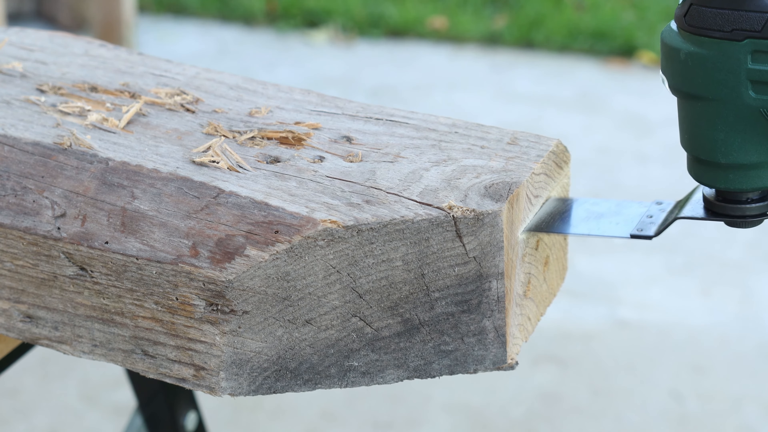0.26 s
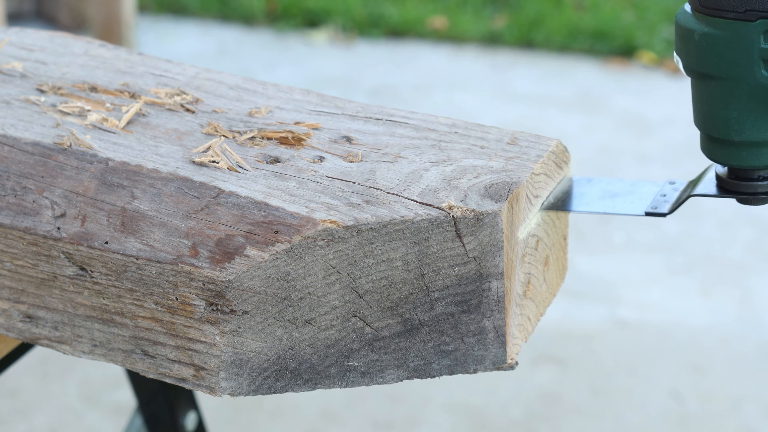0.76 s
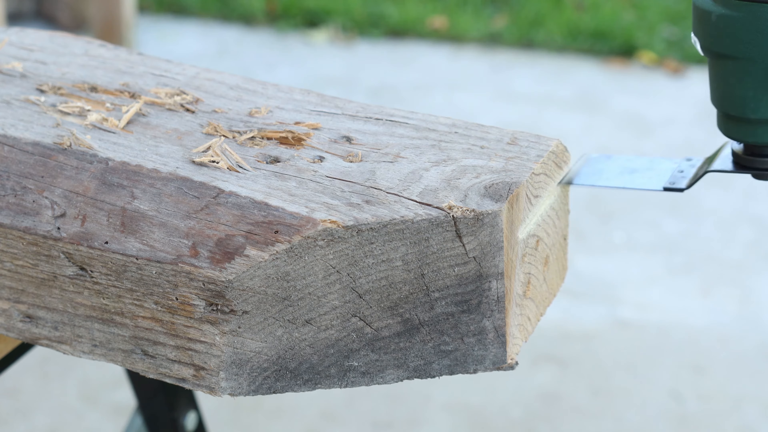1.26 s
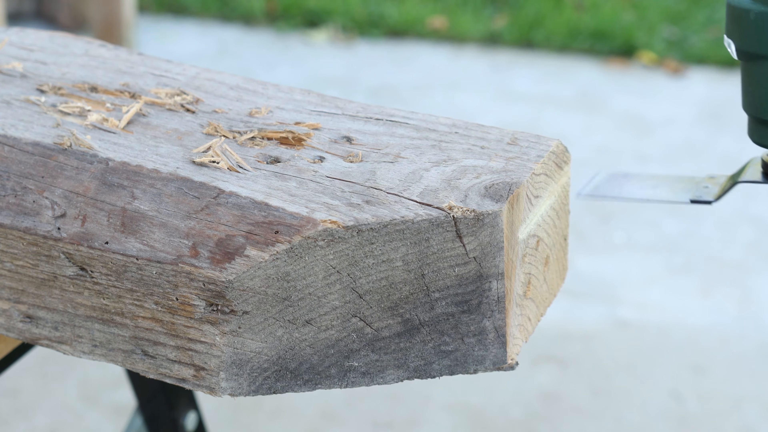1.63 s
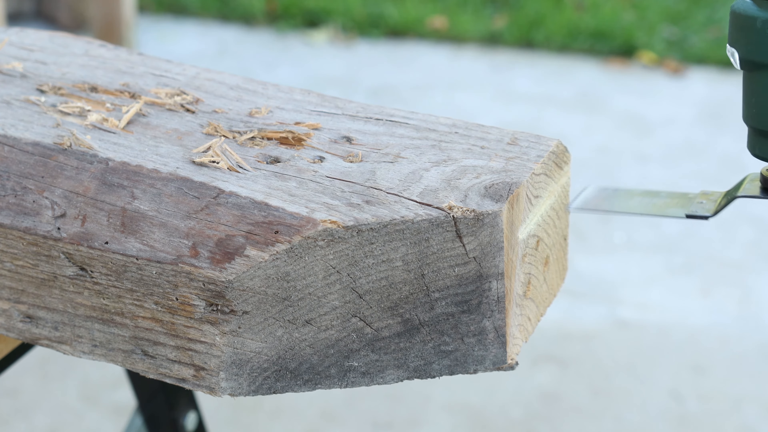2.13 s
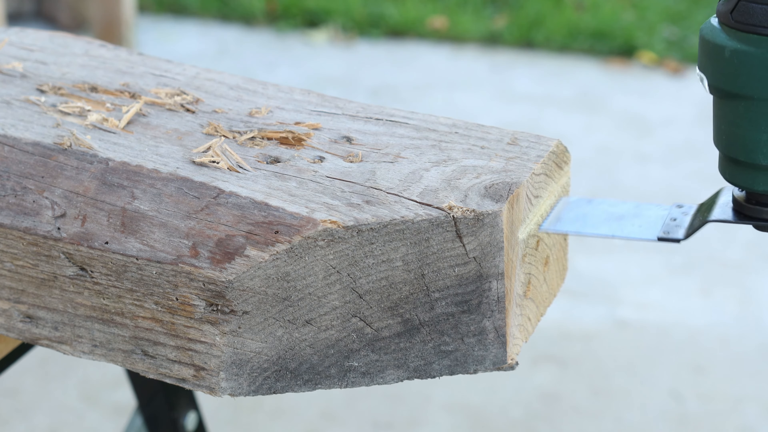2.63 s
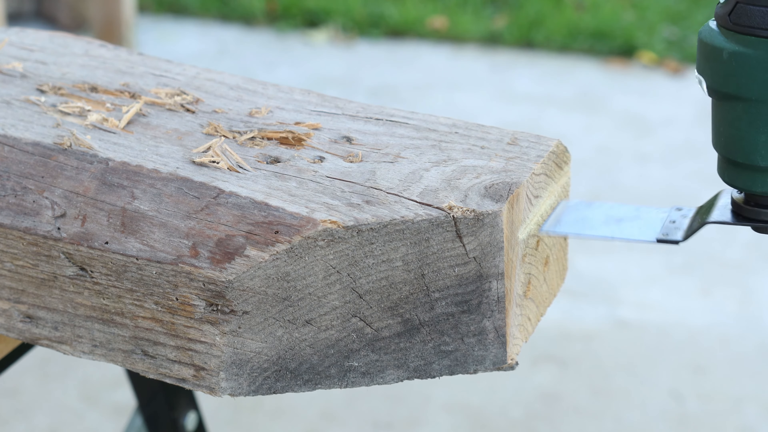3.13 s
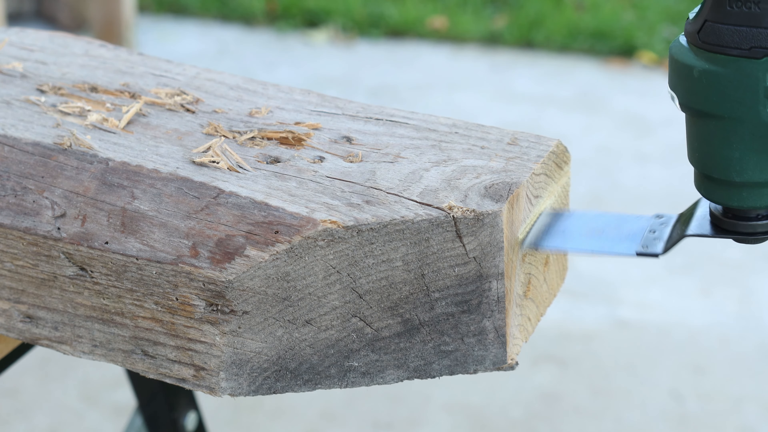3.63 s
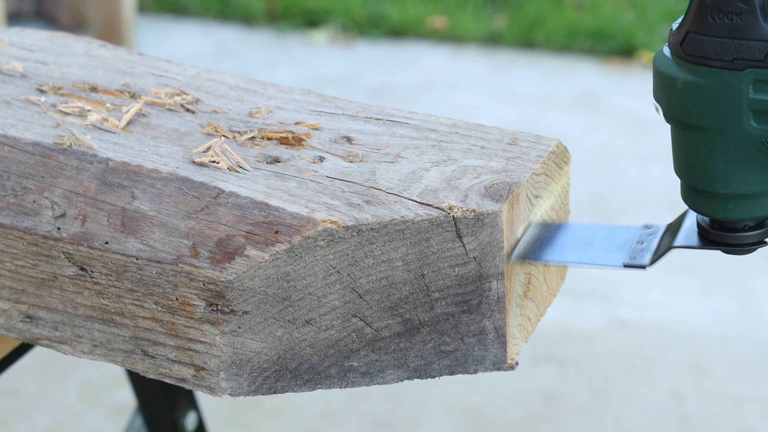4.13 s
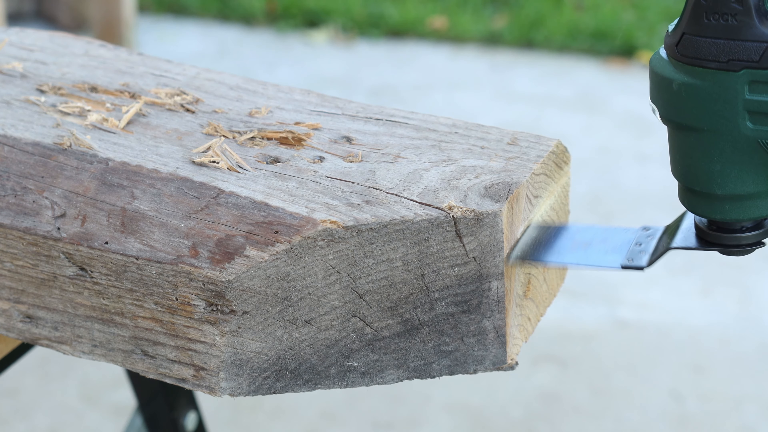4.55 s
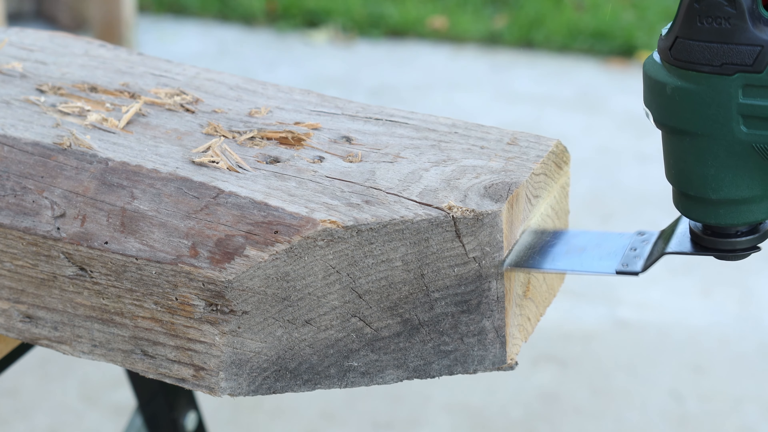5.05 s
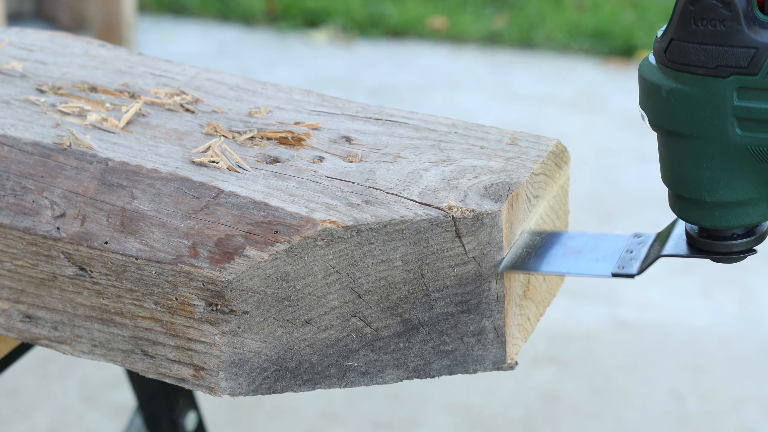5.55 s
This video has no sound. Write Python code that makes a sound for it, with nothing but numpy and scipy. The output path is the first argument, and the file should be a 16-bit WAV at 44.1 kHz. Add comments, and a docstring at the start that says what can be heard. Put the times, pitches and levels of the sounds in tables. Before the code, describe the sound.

A nasal motor whine with rattling gears runs throughout. Irregular wood chatter and a few sharp knocks come first, then a clear free-running buzz that slows, drops and revs well above its starting pitch. At the end the teeth touch wood again, and the tone becomes gritty, with a growing low hum and tearing crackle. Close stereo capture in open air, thin hiss on top, barely audible yard rumble.

```python
"""A cordless oscillating saw outdoors, taken up close in stereo by two microphone ports.
First the blade skims and bounces on the end of a wooden beam: chatter, a low hum and a few hard snags. Then it
runs free while its speed is dialled down and up, and at last it plunges into the wood. Throughout, two yoke
knocks a shaft turn ring the housing as a whine, gears rattle and the steel hisses and sings near 9 kHz.
Behind it lie a low rumble of the yard and a little scatter from paving and beam."""
import sys
import numpy as np
from scipy import signal
from scipy.fft import rfft, irfft, next_fast_len
from scipy.io import wavfile
from scipy.ndimage import uniform_filter1d

SR = 44100
rng = np.random.default_rng(int(sys.argv[2]) if len(sys.argv) > 2 else 0)


def pcm_store(signal):
    """Save signal as 16-bit PCM."""
    levels = np.round(np.clip(np.atleast_2d(signal), -1, 1) * 32767)
    wavfile.write(sys.argv[1], SR, levels.astype(np.int16).T)


N = 255339
T = np.arange(N) / SR  # time [s]
M = next_fast_len(N + 8192, real=True)  # padded length, so that rings do not wrap round
F = np.arange(1, M // 2 + 2) * SR / M  # frequency of each bin [Hz], shifted up one bin to avoid zero
SMALL = 1 / (1 - 1j * 310.0 / F) ** 2  # a small housing radiates no bass


def undb(db):
    """Amplitude of a level in dB."""
    return 10 ** (np.asarray(db) / 20)


def level(x, db):
    """Scale to an rms level."""
    return x * undb(db) / np.sqrt(np.mean(x ** 2))


def curves(table, s=T):
    """Columns of a table as straight lines in time."""
    at, *columns = np.transpose(table)
    return [np.interp(s, at, c) for c in columns]


def on_log(points, hz=F):
    """Values of (frequency, value) points on a log-frequency axis."""
    at, value = np.transpose(points)
    return np.interp(np.log(hz), np.log(at), value)


def modes(table, hz=F):
    """Complex response of resonances (frequency, width, level), neighbours in opposite sign."""
    total = 0
    for k, (f, width, db) in enumerate(table):
        detuning = (hz / f - f / hz) * f / width
        total = total + (-1) ** k * undb(db) / (1 + 1j * detuning)
    return total


def shape(x, response):
    """Filter by a frequency response."""
    return irfft(rfft(x, M) * response, M)[..., :N]


def walk(rate, count):
    """Random levels held 1 / rate s and slewed twice; spread near 1."""
    hold = int(SR / rate)
    held = np.repeat(rng.standard_normal(count // hold + 1), hold)
    return 1.3 * uniform_filter1d(uniform_filter1d(held, hold), hold)[:count]


def puffs(turn, width):
    """A burst at each half turn that dies away over a share of the half turn."""
    return np.exp(-(2 * turn % 1) / width)


# Speed of the saw, sagging under load and following the dial when free:
# (time [s], stroke rate [Hz], whine level [dB])
SPEED = [(0, 144, -19), (.15, 142.8, -20), (.44, 145.7, -16), (.5, 146.5, -24), (.63, 140.2, -24),
         (.69, 144.4, -22), (.92, 141.8, -19), (1.03, 140.5, -18), (1.07, 140.1, -20), (1.15, 138.9, -21.5),
         (1.4, 143.2, -21.5), (1.45, 149.7, -25.5), (1.56, 159.4, -20), (1.65, 160.5, -20),
         (2.11, 161.3, -19), (2.2, 155.3, -19.5), (2.29, 151.9, -19.5), (2.43, 151.1, -19.5),
         (2.54, 143.8, -21.5), (2.61, 141.9, -21), (2.66, 137.9, -21.5), (2.745, 135.3, -22),
         (2.8, 130.1, -22), (2.86, 124, -23.5), (2.92, 123.5, -22.5), (3.06, 129.8, -22),
         (3.14, 135.6, -21), (3.3, 158, -17.5), (3.38, 161, -17.5), (3.43, 167, -16), (3.465, 171.8, -17.5),
         (3.51, 180.5, -15.5), (3.53, 182.4, -15), (3.585, 190.3, -14.5), (3.65, 200.2, -14.5),
         (3.7, 208.5, -15.5), (3.75, 216.2, -15), (3.8, 221.5, -15.5), (3.89, 233.9, -13),
         (4.0, 236.2, -16), (4.36, 234.7, -17.5), (4.5, 232.8, -17), (4.8, 230.2, -18), (4.86, 231, -16),
         (4.96, 229.3, -16), (5.0, 229.6, -18.5), (5.13, 228.7, -20), (5.27, 223.1, -18.5),
         (5.32, 223.2, -20.5), (5.43, 220.3, -20), (5.48, 220.8, -19.5), (5.79, 221.5, -21)]


def speed():
    """Stroke rate and whine level: the motor slows against the wood and follows the dial in free air."""
    return curves(SPEED)


FLARE_HZ_PER_S = 90  # sweep at which the measure of a changing speed bends towards 1


def gliding(hz, s, size):
    """How quickly the speed changes, 0-1."""
    return np.tanh(uniform_filter1d(abs(np.gradient(hz, s)), size=size) / FLARE_HZ_PER_S)


# Spells in which the upper overtones and the crackle sound duller: (from [s], until [s], level change [dB])
DULLED = [(0, 0.073, -3.5), (0.145, .27, -4), (0.473, 0.858, -2), (5.276, 5.436, -2.5)]


def dulled():
    """Level change in dB of the upper overtones and the crackle, eased in and out of each dull spell."""
    db = sum(change * ((T > a) & (T < b)) for a, b, change in DULLED) * 1.
    return uniform_filter1d(db, size=1200)


# Resonances of the tool's housing: (frequency [Hz], width [Hz], relative level [dB])
BODY = [(655, 470, -13), (1054, 320, -6), (1426, 280, -2), (2110, 300, -1), (2435, 180, 0),
        (2763, 114, 5.5), (3420, 780, -2.5), (4780, 160, 0.5), (5540, 21, -16)]


def housing(hz):
    """Resonances of the housing, which colour both the whine and the rattle."""
    return modes(BODY, hz)


# Overtones of the whine in each state of running: (multiple of the stroke rate, relative level [dB])
SKIMMING = [(3, -14), (4, -16), (5, -4), (6, -4), (7, -10), (8, -1), (9, 0), (10, -12), (11, 0), (12, -17),
            (13, -4), (14, -3), (15, -4), (16, -1), (17, -9), (18, -4), (19, 0), (20, -10), (21, -9),
            (22, -9), (23, -2), (24, -5), (25, -14), (26, -11), (27, -9), (28, -9), (29, -17), (30, -21),
            (31, -18), (32, -19), (33, -17), (34, -21), (35, -29), (36, -30), (37, -30), (38, -28)]
FREE = [(3, -8), (4, -12), (5, -15), (6, -12), (7, -9), (8, -2), (9, -9), (10, -5), (11, -16), (12, -8),
        (13, -12), (14, -6), (15, -11), (16, 0), (17, -6), (18, -5), (19, -10), (20, -16), (21, -17),
        (22, -23), (23, -14), (24, -17), (25, -29), (26, -31), (27, -27), (28, -18), (29, -23), (30, -18),
        (31, -31), (32, -35), (33, -32), (34, -30), (35, -39), (36, -37)]
SLIDING = [(3, -11), (4, -9), (5, -2), (6, -8), (7, -3), (8, -2), (9, 0), (10, -5), (11, -5), (12, -10),
           (13, -7), (14, -2), (15, -5), (16, -11), (17, -9), (18, -3), (19, -4), (20, -2), (21, -7),
           (22, -9), (23, -9), (24, -14), (25, -9), (26, -11), (27, -13), (28, -14), (29, -14), (30, -18),
           (31, -29), (32, -16), (33, -22), (34, -25), (35, -27), (36, -25), (37, -21), (38, -30)]
SLOWEST = [(3, -5.5), (4, -2), (5, -13), (6, -6), (7, 3), (8, -7), (9, 9.5), (10, 3.5), (11, -8), (12, 3),
           (13, -9), (14, -2), (15, -16), (16, -3), (17, -5), (18, -7), (19, 8), (20, -1.5), (21, 6),
           (22, 3.5), (23, 6), (24, 2.5), (25, -3), (26, -18), (27, -3), (28, -9), (29, -5), (30, -10),
           (31, -10), (32, -17), (33, -22), (34, -10), (35, -33), (36, -15), (37, -9), (38, -18), (39, -15),
           (40, -31), (41, -28), (42, -29), (43, -13), (44, -34), (45, -43), (46, -44)]
RISING = [(3, -1), (4, -2), (5, -8), (6, -5), (7, -1), (8, 9), (9, 3), (10, -4), (11, -1), (12, 0),
          (13, -10), (14, 6), (15, -11), (16, 9.5), (17, 1), (18, 7), (19, -5), (20, -17), (21, -8),
          (22, -8), (23, -4.5), (24, -20), (25, -17), (26, -22), (27, -30), (28, -8), (29, -25), (30, -6.5),
          (31, -34), (32, -21), (33, -29), (34, -32), (35, -38), (36, -41)]
FLAT_OUT = [(3, -8), (4, -20), (5, -8), (6, -6), (7, -2), (8, -9), (9, -13), (10, -2), (11, -17), (12, 0),
            (13, -9), (14, -17), (15, -9), (16, -17), (17, -20), (18, -26), (19, -20), (20, -20), (21, -22),
            (22, -25), (23, -25), (24, -35), (25, -38), (26, -38)]
BITING = [(3, -3), (4, -10), (5, 0), (6, -9), (7, -4), (8, 0), (9, -14), (10, -4), (11, -1), (12, 0),
          (13, -4), (14, -10), (15, -5), (16, -13), (17, -17), (18, -12), (19, -14), (20, -20), (21, -10),
          (22, -20), (23, -19), (24, -25), (25, -30), (26, -33)]
BURIED = [(3, -5), (4, -3), (5, -3), (6, -6), (7, -7), (8, -9), (9, -3), (10, -2), (11, -3), (12, -5),
          (13, 0), (14, -3), (15, -10), (16, -9), (17, -8), (18, -13), (19, -16), (20, -15), (21, -18),
          (22, -20), (23, -23), (24, -23), (25, -26), (26, -27)]
BOUNCING = [(3, -14), (4, -13), (5, -6), (6, -14), (7, -6), (8, -3), (9, 0), (10, -1), (11, -7), (12, -14),
            (13, -10), (14, -14), (15, -11), (16, -8), (17, -14), (18, -11), (19, -7), (20, -8), (21, -13),
            (22, -15), (23, -12), (24, -14), (25, -18), (26, -15), (27, -24), (28, -19), (29, -19),
            (30, -26), (31, -23), (32, -24), (33, -23), (34, -22), (35, -29), (36, -27), (37, -33),
            (38, -31)]
EASED = [(3, -11), (4, -12), (5, -22), (6, -11), (7, -14), (8, -4), (9, -19), (10, -5), (11, -15), (12, -6),
         (13, -15), (14, -5), (15, -15), (16, -12), (17, -12), (18, 0), (19, -7), (20, -10), (21, -12),
         (22, -20), (23, -27), (24, -25), (25, -14), (26, -22), (27, -28), (28, -32), (29, -24), (30, -33),
         (31, -21), (32, -21), (33, -34), (34, -35), (35, -34), (36, -36), (37, -34), (38, -36)]
SLOWING = [(3, -10), (4, -14), (5, -15), (6, -13), (7, -27), (8, -3), (9, -6), (10, -9), (11, -14),
           (12, -6), (13, -12), (14, -16), (15, -7), (16, -14), (17, -3), (18, -11), (19, 0), (20, -5),
           (21, -5), (22, -14), (23, -18), (24, -19), (25, -14), (26, -17), (27, -23), (28, -19), (29, -21),
           (30, -29), (31, -27), (32, -20), (33, -23), (34, -25), (35, -22), (36, -26), (37, -33),
           (38, -39), (39, -34), (40, -38)]
REVVING = [(3, -12), (4, -20), (5, -12), (6, -13), (7, 0), (8, -3), (9, -13), (10, -15), (11, -13),
           (12, -8), (13, -8), (14, -9), (15, -3), (16, -11), (17, -13), (18, -15), (19, -14), (20, -15),
           (21, -18), (22, -22), (23, -25), (24, -19), (25, -19), (26, -20), (27, -27), (28, -36),
           (29, -41), (30, -45)]
NEAR_TOP = [(3, -8), (4, -8), (5, -4), (6, -8), (7, -5), (8, -8), (9, -7), (10, -10), (11, -5), (12, -5),
            (13, 0), (14, -4), (15, -15), (16, -14), (17, -15), (18, -19), (19, -18), (20, -19), (21, -24),
            (22, -14), (23, -22), (24, -24), (25, -33), (26, -31), (27, -70)]
TOUCHING = [(3, -4), (4, -12), (5, -4), (6, -11), (7, -2), (8, -11), (9, -7), (10, 0), (11, -4), (12, 0),
            (13, -1), (14, -7), (15, -11), (16, -12), (17, -17), (18, -22), (19, -19), (20, -16), (21, -12),
            (22, -21), (23, -30), (24, -30), (25, -39), (26, -33)]
SINGING = [(3, -8), (4, -12), (5, -6), (6, -17), (7, -20), (8, -4), (9, -6), (10, -17), (11, 0), (12, -1),
           (13, -4), (14, -6), (15, -15), (16, -12), (17, -12), (18, -16), (19, -25), (20, -26), (21, -28),
           (22, -25), (23, -28), (24, -34), (25, -36), (26, -40)]
SINKING = [(3, -4), (4, -5), (5, -6), (6, -9), (7, -5), (8, -7), (9, -11), (10, -11), (11, -8), (12, 0),
           (13, -8), (14, -9), (15, -9), (16, -13), (17, -14), (18, -15), (19, -22), (20, -20), (21, -27),
           (22, -26), (23, -31), (24, -28), (25, -34), (26, -38)]
# States in order, each fading into the next:
# (overtones, stroke rate they hold for [Hz], fully in from [s], until [s])
RUNNING = [(SKIMMING, 145, 0, .47), (BOUNCING, 143, .5, .84), (SLIDING, 141.4, .89, 1.03),
           (BOUNCING, 141, 1.06, 1.43), (FREE, 161, 1.56, 2.14), (EASED, 151.5, 2.22, 2.45),
           (SLOWING, 140.5, 2.52, 2.72), (SLOWEST, 124, 2.82, 3.0), (RISING, 161.3, 3.3, 3.42),
           (REVVING, 190, 3.5, 3.61), (NEAR_TOP, 216, 3.7, 3.82), (FLAT_OUT, 235, 3.88, 4.42),
           (TOUCHING, 231.5, 4.45, 4.6), (BITING, 230.8, 4.63, 4.82), (SINGING, 229.5, 4.85, 4.96),
           (SINKING, 227, 4.99, 5.27), (BURIED, 221.5, 5.3, 5.79)]
STAYS = 0.92  # share of the overtone pattern that stays at its pitch when the speed changes


def overtone_patterns(orders, hz, s):
    """Level in dB of each overtone before the housing colours it, crossfaded between states."""
    times = [at for *_, start, end in RUNNING for at in (start, end)]
    shares = [np.interp(s, times, np.repeat(row, 2)) for row in np.eye(len(RUNNING))]
    own_db = []
    for overtones, f, *_ in RUNNING:
        heard_db = np.interp(orders, *np.transpose(overtones), right=-38)
        own_db.append(heard_db - 20 * np.log10(abs(housing(orders * f)) + 0.059))
    return [sum(share * np.interp(k * (hz / f) ** STAYS, orders, db)
                for share, db, (_, f, *_) in zip(shares, own_db, RUNNING)) for k in orders]


# The two yoke knocks of a turn: (time [s], strength of the second against the first [0-1, held to 0.95],
# share of the housing's lag in each overtone [0-1])
KNOCKS = [(0, 0.7, 0), (.45, 0.45, 0.3), (.55, 0.5, 0.66), (.85, 1, .5), (1.0, 0.76, 0.39),
          (1.5, 0.7, 0.24), (2.1, 0.86, 0.45), (2.3, 0.48, 0.38), (3.4, 0.5, 0.37), (3.5, 0.26, 0.41),
          (3.62, 0.33, 0.18), (3.72, 1, 0.36), (3.9, 0.25, 0.3), (4.5, .3, .15), (4.9, .64, 0.36),
          (5.2, 0.46, .3), (5.35, .75, 0.43), (5.79, 0.71, 0.32)]
FLARE_DB = 3  # the overtones flare and fade at random while the speed changes
GLIDE_FLUTTER, GLIDE_SMEAR = 0.4, 0.29  # flutter and blur of a changing speed, as shares of those under load
DULLED_ABOVE_HZ = 1200


def whine(hz, turn, rough):
    """Two nearly opposite knocks a turn, as overtones that swell where they cross a housing resonance."""
    step = 64  # slow curves are worked out once every 64 samples
    s, slow_hz, slow_rough = T[::step], hz[::step], rough[::step]
    orders = np.arange(3, SLOWEST[-1][0] + 1)
    glide = gliding(slow_hz, s, size=100)
    second, lag = np.clip(curves(KNOCKS, s), 0, .95)
    dull_db = dulled()[::step]
    gains, phases = [], []
    for k, pattern_db in zip(orders, overtone_patterns(orders, slow_hz, s)):
        overtone_hz = k * slow_hz
        body = housing(overtone_hz)
        # the ports partly cancel in the treble, so each port alone hears it louder; the top rolls off
        top = 1 / (1 + (overtone_hz / 6000.) ** 12)
        top = top / np.maximum(np.cos(port_lag(overtone_hz) / 2), .35)
        # every overtone wavers slowly on its own; a loaded blade adds a quick flutter, most to the high
        # ones, and loose play shakes them while the speed changes
        flutter = np.hypot(slow_rough, GLIDE_FLUTTER * glide) * min(k / 11.3, 1)
        waver_db = 0.56 * walk(8 * step, count=len(s))
        waver_db += 6.5 * flutter * walk(60. * step, count=len(s))
        waver_db += FLARE_DB * glide * walk(26. * step, count=len(s))
        waver_db += dull_db / (1 + (DULLED_ABOVE_HZ / overtone_hz) ** 4)
        gains.append(undb(pattern_db + waver_db) * (abs(body) + 0.091) * top)
        # load or a changing speed blurs the knocks by letting the phases drift
        knocks = np.angle(1 - second * np.exp(-2j * np.pi * k * .47))
        smear = np.hypot(slow_rough, GLIDE_SMEAR * glide) * min(k / 8.5, 1)
        drift = .28 * walk(5 * step, count=len(s)) + 2.6 * smear * walk(30 * step, count=len(s))
        phases.append(lag * np.unwrap(np.angle(body)) + knocks + drift)
    total = np.sqrt(np.sum(np.square(gains), axis=0) / 2)
    return sum(np.interp(T, s, g / total) * np.cos(2 * np.pi * k * turn + np.interp(T, s, p))
               for k, g, p in zip(orders, gains, phases))


# Bouts in which the blade bounces or binds and the teeth tear: (start [s], length [s], chatter level [dB])
BOUTS = [(0.157, 0.08, -27), (0.481, 0.098, -26), (0.616, 0.046, -27), (.74, 0.027, -31),
         (1.052, 0.026, -20.5), (1.078, 0.31, -26.5), (1.143, 0.05, -26.5), (1.226, 0.017, -29),
         (1.292, 0.077, -26.5), (1.407, 0.083, -27), (4.337, 0.021, -29.5), (4.38, 0.035, -27),
         (4.465, 0.034, -29), (4.538, 0.045, -37), (4.722, 0.049, -36), (4.969, 0.23, -29),
         (5.05, 0.023, -28), (5.14, .025, -31), (5.211, 0.041, -31), (5.44, 0.064, -29),
         (5.532, 0.15, -24.5), (5.681, 0.15, -24)]
BOUT_RISE_S, BOUT_FALL_S = 0.0094, 0.014


def bouts():
    """Amplitude of the tearing bouts: quick rise, hold, slower fall, added as powers."""
    power = 0
    for s, length, db in BOUTS:
        rise = np.maximum(s - T, 0) / BOUT_RISE_S
        fall = np.maximum(T - s - length, 0) / BOUT_FALL_S
        power = power + undb(db) ** 2 * np.exp(-2 * (rise + fall))
    return np.sqrt(power)


# Resonances of the beam around the cut: (frequency [Hz], width [Hz], relative level [dB])
WOOD = [(209, 19, -12), (572, 140, -10), (932, 103, 0.5), (1380, 177, -1.5), (1890, 341, 4),
        (2524, 326, 8.5), (2854, 330, 9), (3650, 790, 3.5), (4620, 410, 2.5), (5320, 410, -2.5)]
# Boom of the beam's modes under 1.5 kHz in the chatter, strongest while the blade bounces on the end face:
# (time [s], relative level [dB])
BOOM = [(0, 0), (.3, 4), (.58, 5), (.615, 11.5), (.665, 14.5), (.72, 4), (1.0, 9), (1.2, 13.5), (1.55, 1.5),
        (4.5, -5), (5.0, 1.5), (5.55, 6.5)]
STROKE_DB, SWELL_DB = 2.2, 1.3  # spread of bite from one half turn to the next; slow unevenness of the grain
SLAP_DB, SLAP_SPREAD_DB, SLAP_JITTER_S = 14.5, 2.5, .0004  # slap level over a basic tooth click


def chatter(turn):
    """Teeth tear fibres: dense uneven clicks, bunched as each stroke bites, ring the wood."""
    chance = rng.random((3, N))
    clicks_per_s = 4500. * (.25 + 2.8 * puffs(turn, .25))
    stroke_db = STROKE_DB * rng.standard_normal(N // 64)[(2 * turn).astype(int)]
    size_db = np.minimum(-2.4 * np.log(chance[2] + 1e-9), 6.)
    size = undb(size_db + stroke_db + SWELL_DB * walk(45., count=N))
    clicks = (chance[0] < clicks_per_s / SR) * np.sign(chance[1] - .5) * size
    # once a turn the blade slaps the kerf, a little early or late and harder or softer each time
    slap = rng.standard_normal((N // 64, 2))
    at = np.flatnonzero(np.diff(turn // 1))
    late = (SLAP_JITTER_S * SR * slap[:len(at), 0]).astype(int)
    clicks[np.clip(at + late, 0, N - 1)] += undb(SLAP_DB + SLAP_SPREAD_DB * slap[:len(at), 1])
    low = [mode for mode in WOOD if mode[0] < 1500]
    high = [mode for mode in WOOD if mode[0] >= 1500]
    soft = 1 / (1 + 1j * F / 11700.0) ** 2  # fibres give way over a moment, so the clicks are not sharp
    soft = soft / (1 - 1j * 140.0 / F) ** 2  # a beam end radiates no deep bass
    boom = undb(curves(BOOM)[0]) * shape(clicks, modes(low) * soft)
    crackle = undb(dulled()) * shape(clicks, modes(high) * soft)
    return level(boom + crackle, 0.82)


# Moments when a tooth catches: (time [s], peak level at the source [dB])
SNAGS = [(1.056, -8), (1.069, -16), (1.079, -21), (1.139, -4), (1.169, -10), (1.177, -9), (1.183, -14),
         (1.298, -21), (1.343, -12)]


def snags():
    """Single hard catches of a tooth, ringing the same wood."""
    hit = np.zeros(N)
    response = modes(WOOD) ** 2 * SMALL
    ring = shape((np.arange(N) == 0) * 1., response)
    for s, peak_db in SNAGS:
        hit[int(s * SR)] = undb(peak_db) / np.max(abs(ring))
    return shape(hit, response)


# Blade on the wood, and the hum: (time [s], contact [0-1], hum at the stroke rate [dB], at twice the rate [dB])
CONTACT = [(0, 0.8, -53, -46.5), (.16, 0.56, -50, -43), (.23, 0.97, -51, -46), (.27, 0.4, -54, -43),
           (.47, 0.4, -54, -45), (.49, 0.7, -49, -47), (.6, 0.9, -48, -48), (.8, 0.8, -47, -47),
           (1.0, 0.5, -47.5, -47), (1.05, 0.46, -47, -53), (1.4, 0.82, -51, -44.5), (1.5, 0.02, -63, -59),
           (2.1, 0.04, -63, -56.5), (2.9, 0.04, -62, -62.5), (3.35, 0.06, -60, -56.5),
           (3.6, 0.02, -47, -56), (3.71, 0, -76, -50), (3.9, 0.08, -68, -44.5), (4.4, 0.14, -58.5, -48),
           (4.94, 0.5, -42.5, -44.5), (5.0, 0.75, -42, -41), (5.13, 0.74, -40, -39.5),
           (5.27, 0.95, -37, -43), (5.3, 1, -34.5, -42), (5.42, 0.57, -34, -43), (5.46, 1, -32, -39),
           (5.5, 0.85, -31.5, -42), (5.79, 0.81, -32.5, -39.5)]
HUM_WAVER_DB = 2  # unsteadiness of the hum while the teeth tear


def hum(turn, rough):
    """The beam, or in free air the housing near 190 Hz, hums at the stroke rate and twice that."""
    _, once_db, twice_db = curves(CONTACT)
    once = undb(once_db + HUM_WAVER_DB * rough * walk(30., count=N))
    twice = undb(twice_db + HUM_WAVER_DB * rough * walk(30., count=N))
    return np.sqrt(2) * (once * np.sin(2 * np.pi * turn) + twice * np.sin(4 * np.pi * turn))


# Broad rasp of the gear head: (frequency [Hz], width [Hz], relative level [dB])
GEARS = [(4380, 320, -15), (4740, 510, -8), (5600, 160, -2.5)]


def rattle(turn):
    """Loose play in the gearing: noise, puffed at each half turn, in the housing's resonances."""
    noise = (.3 + puffs(turn, 0.11)) * rng.standard_normal(N)
    return level(shape(noise, (housing(F) + modes(GEARS)) * SMALL), -6.5)


# Spectrum of the blade's hiss: (frequency [Hz], relative density [dB per Hz])
HISS = [(2500, -50), (4500, -24), (5800, -35), (6500, -6), (8000, 0), (9300, -3.5), (10800, -1.5),
        (11500, -12), (12200, -64)]
# Narrow modes of the steel: (frequency [Hz], width [Hz], level over the hiss before contact is counted [dB])
BLADE = [(8500, 40, -8), (9030, 45, -5)]
RING_FREE_DB, RING_DAMPED_DB = 7.5, -53  # added to the ring in free air; change at full contact
RING_KNOCK_DB = 30  # regular knocks over loose rattle in what strikes the steel


def blade(turn, contact):
    """Knock-gated rattle: a hiss, partly unlike at the two ports, and the narrow modes of the steel."""
    steady = (np.exp(-(turn % 1) / 0.0038) - .002) * 3.3  # the part that repeats exactly, once a turn
    loose = (0.97 + puffs(turn, 0.17)) * rng.standard_normal(N) + steady
    flicker = undb(1.0 * walk(12.0, count=N))
    spectrum = undb(on_log(HISS))
    hiss = level(shape(loose * flicker, spectrum), 0)
    unlike = level(shape(rng.standard_normal((2, N)) * flicker, spectrum), -3.5)
    # the steel sings out whenever an overtone of the knocks lands on one of its modes
    strikes = level(loose, 0) + level(steady, RING_KNOCK_DB)
    ring = 0
    for f, width, db in BLADE:
        tone = level(shape(strikes, modes([(f, width, 0)]) ** 2), db)
        ring = ring + tone * undb(1.96 * walk(14.0, count=N))
    return hiss + undb(RING_FREE_DB + RING_DAMPED_DB * contact) * ring, unlike


# Spectrum of the low outdoor rumble: (frequency [Hz], relative density [dB per Hz])
YARD = [(15, -48), (25, -13.5), (54, -11), (113, -8.5), (254, -9.5), (325, -14), (400, 2), (520, -33),
        (880, -120)]
# Level of the rumble, turned down by the recorder's gain while the saw is loud, with a thump at 1.14 s:
# (time [s], relative level [dB])
RUMBLE = [(0, -64), (1.06, -66), (1.14, -47), (1.22, -56), (1.6, -66), (3.13, -64), (4.4, -72), (4.6, -88),
          (5.3, -72), (5.79, -60)]


def yard():
    """Low outdoor rumble: shaped noise whose level follows the table."""
    rumble = level(shape(rng.standard_normal(N), undb(on_log(YARD))), 2.1)
    return rumble * undb(curves(RUMBLE)[0])


# Spacing of the microphone ports as heard: (frequency [Hz], lag of left behind right [radians])
PORTS = [(1500, .05), (2500, .3), (3600, 1.2), (4300, 2.3), (5300, 2.45), (7000, 3.1), (8000, 2.7),
         (9000, 1.3), (10000, 1.9), (11000, 2.9)]


def port_lag(hz=F):
    """Phase by which the left port lags the right."""
    return on_log(PORTS, hz)


# Echoes from paving and beam: (frequency [Hz], level against the direct sound [dB])
SCATTER = [(100, -12), (500, -25.5), (1200, -11), (2500, -11), (5000, -11), (9000, 3)]
ECHO_S = .02  # decay time of the scatter


def scatter():
    """Response of dense, decaying random echoes off the paving and the beam."""
    echoes = rng.standard_normal(N) * np.exp(-T / ECHO_S)
    return rfft(echoes / np.linalg.norm(echoes), M) * undb(on_log(SCATTER))


CHATTER_DB = -5  # steady chatter under the whine at full contact
HISS_DB, HISS_DB_PER_OCTAVE, HISS_TORN_DB = -26.5, 1, -26  # under the whine at 150 Hz; under the chatter
STEADY_RATTLE_DB, RATTLE_DB_PER_OCTAVE = -2.5, -5  # less rattle at a steady speed, and less at a high one
PAN_FREE_DB, PAN_CUT_DB = -3, -1.1  # left minus right, in free air and at full contact


def scene():
    """The tool, heard by two close ports with a little scatter from paving and beam."""
    hz, whine_db = speed()
    contact = np.clip(curves(CONTACT)[0], 0, 1)
    turn = np.cumsum(hz * (1 + .001 * walk(30., count=N))) / SR
    octaves = np.log2(hz / 150)
    steady = undb(whine_db + CHATTER_DB) * contact ** 1.2
    tearing = np.hypot(steady, bouts())
    rough = np.clip(tearing / undb(whine_db), 0, 1)

    # three times the steady cut at constant speed, twice it in a fast glide
    loose = undb(STEADY_RATTLE_DB * (3.0 - gliding(hz, T, size=6400)) + RATTLE_DB_PER_OCTAVE * octaves)
    tool = undb(whine_db) * (whine(hz, turn, rough) + loose * rattle(turn))
    tool = tool + tearing * chatter(turn) + snags()
    hiss_free = undb(whine_db + HISS_DB + HISS_DB_PER_OCTAVE * octaves)
    hiss = np.hypot(hiss_free, undb(HISS_TORN_DB) * tearing)
    steel, unlike = (hiss * part for part in blade(turn, contact))
    middle = hum(turn, rough) + steel + yard()

    pan_db = PAN_FREE_DB + np.sqrt(contact) * (PAN_CUT_DB - PAN_FREE_DB)
    echoes = scatter()
    out = []
    for side, own_hiss in zip((1, -1), unlike):  # left, right
        port = np.exp(-.5j * side * port_lag())
        # the scatter is added in opposite sign left and right, which widens the tool's sound
        panned = shape(undb(side * pan_db / 2) * tool, port + side * echoes)
        out.append(panned + shape(middle, port) + own_hiss)
    return np.array(out)


TOP_HZ = 12200  # upper limit of the recorder


def record(dry):
    """The recorder rounds the loudest peaks and cuts the top."""
    low_pass = signal.ellip(10, .2, 70, TOP_HZ, fs=SR, output="sos")
    return signal.sosfilt(low_pass, np.tanh(dry))


dry = scene()
out = record(dry)
pcm_store(out)
```